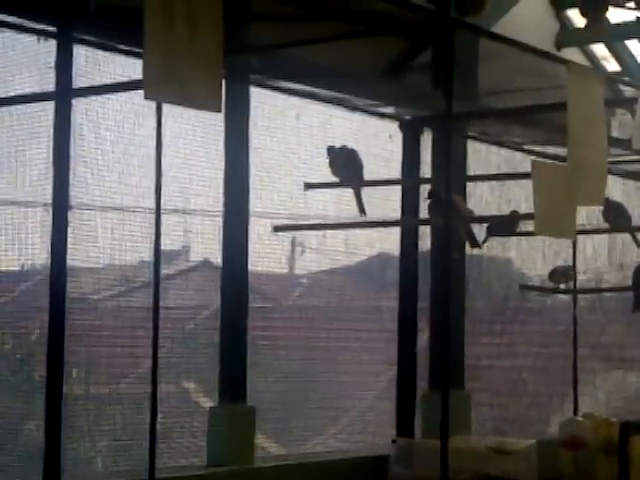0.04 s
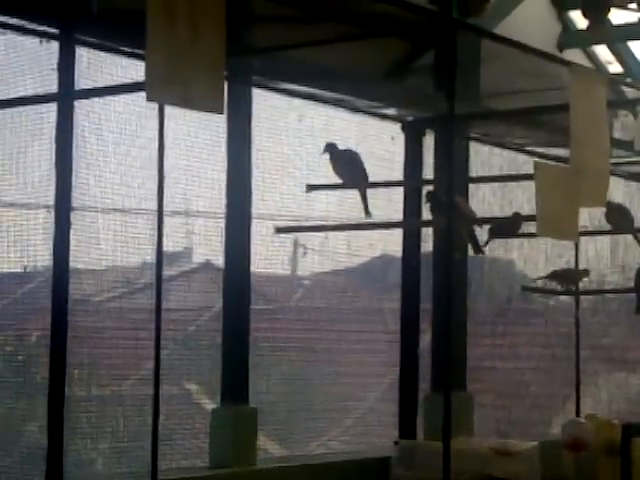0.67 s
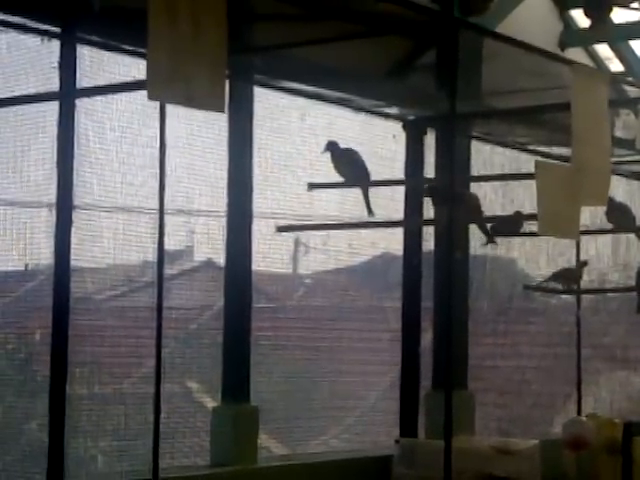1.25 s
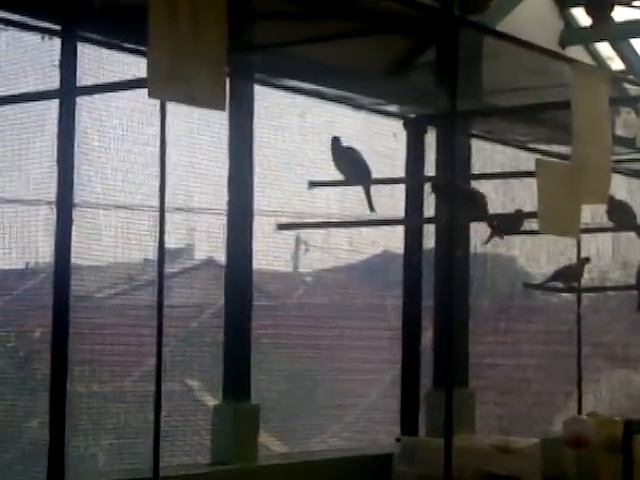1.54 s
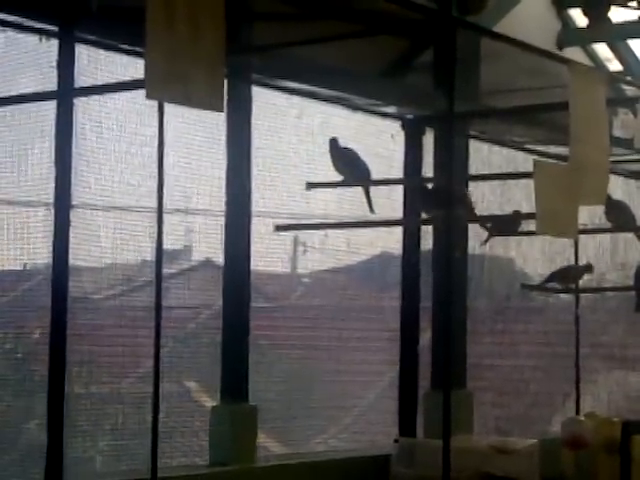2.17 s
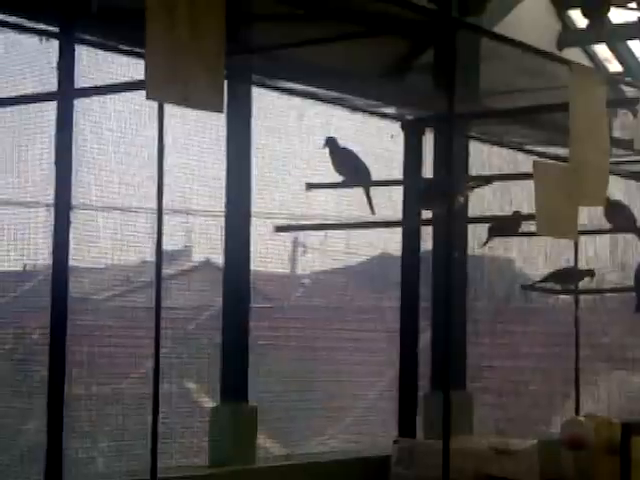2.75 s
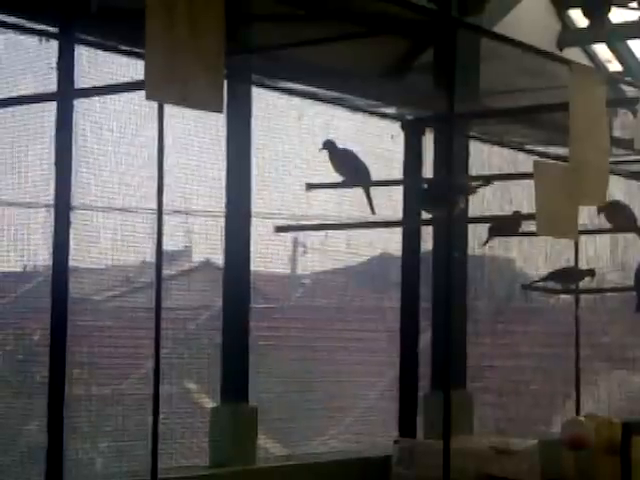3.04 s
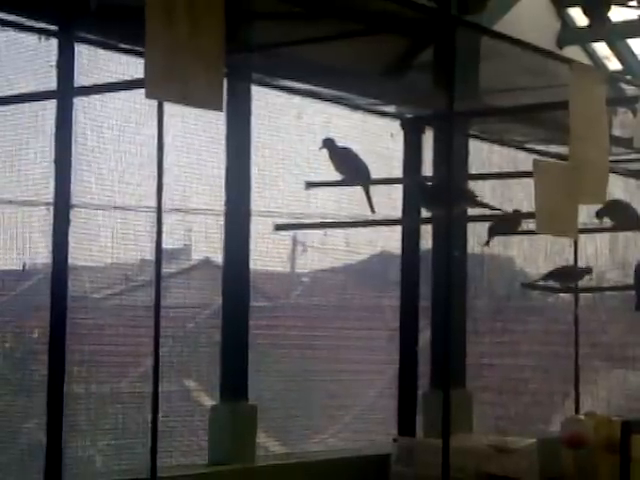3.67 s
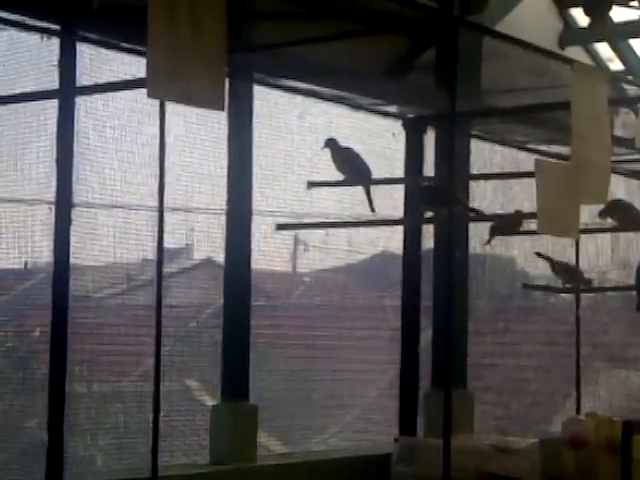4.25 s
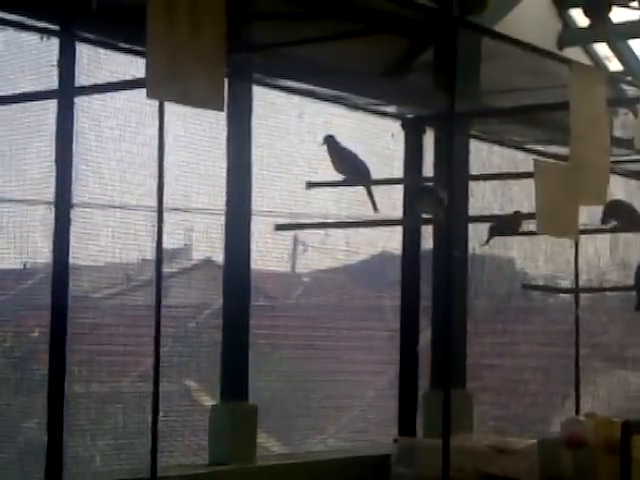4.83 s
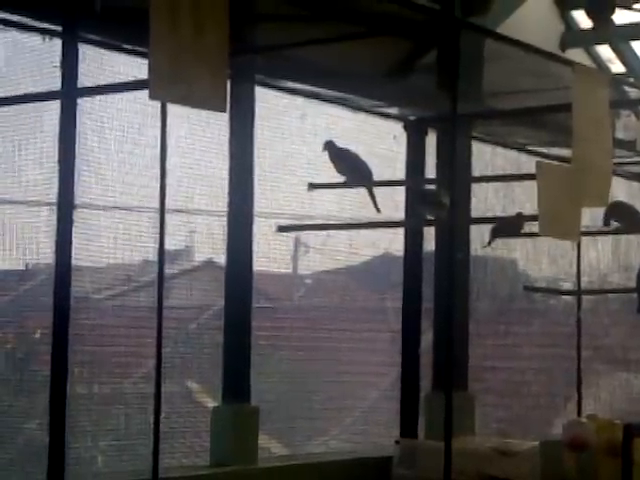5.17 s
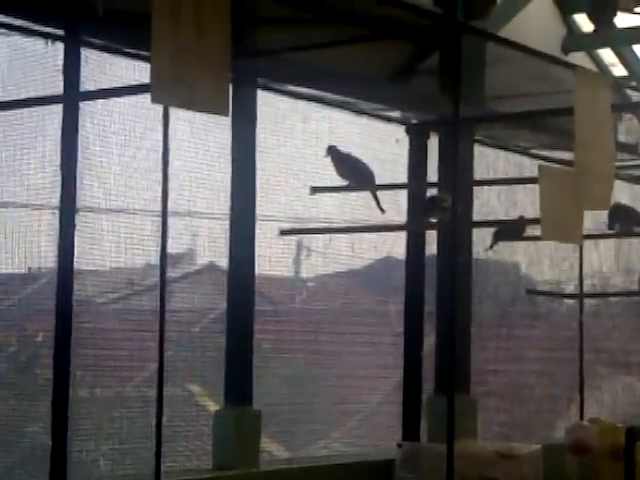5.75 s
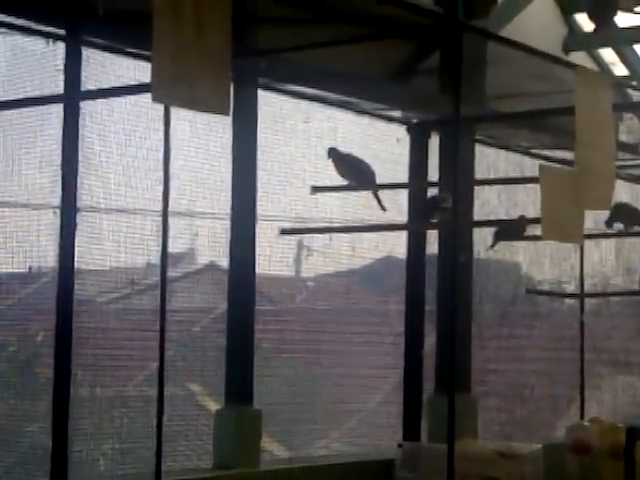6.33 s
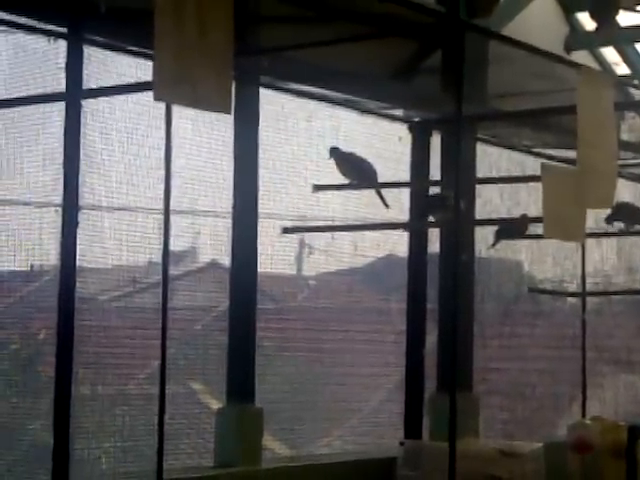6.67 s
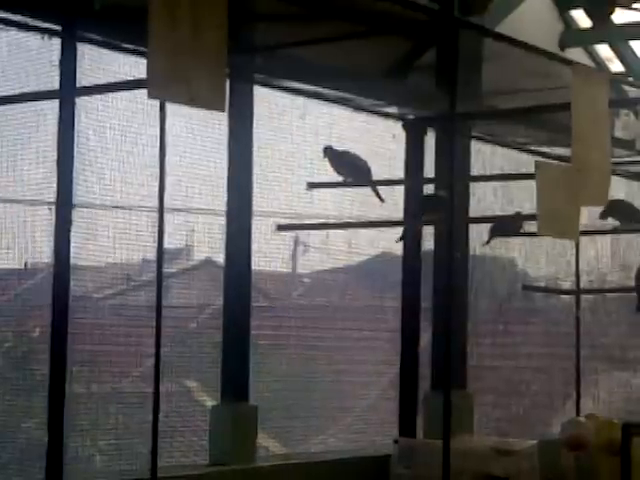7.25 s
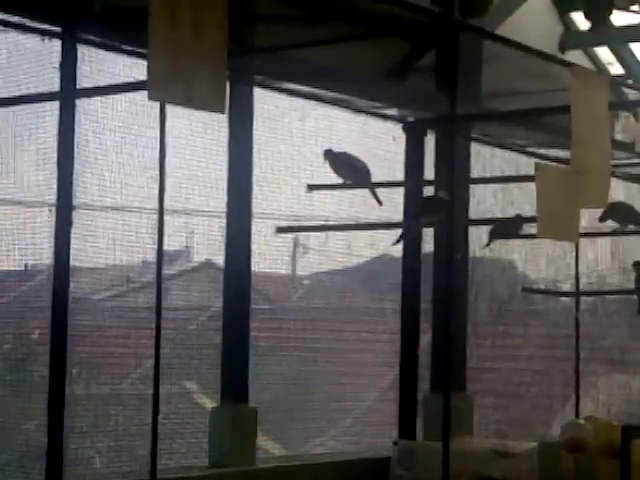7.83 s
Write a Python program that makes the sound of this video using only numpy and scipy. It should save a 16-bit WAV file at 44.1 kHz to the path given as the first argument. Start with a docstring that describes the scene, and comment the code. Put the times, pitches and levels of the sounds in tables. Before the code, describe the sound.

A husky run of dove coos, then a clearer run from a second dove, over soft outdoor air and shuffling feathers.

```python
"""Zebra doves in a roofed aviary

Close to the microphone two doves take turns: a husky run of slowing coos, then a clearer run of upward
scoops, each coo a nearly pure tone from the syrinx. Other doves answer from afar, birds shuffle and
flick their wings on the perches, and small birds chirp. Roof and walls add a short tail.
Outdoor air and a faint electronic whine from the camera lie under everything."""
import sys
import numpy as np
from scipy import signal
from scipy.fft import rfft, irfft, next_fast_len
from scipy.io import wavfile
from scipy.ndimage import uniform_filter1d, map_coordinates

SR = 44100
rng = np.random.default_rng(int(sys.argv[2]) if len(sys.argv) > 2 else 0)


def to_wav(sig):
    """Store sig (one row per channel, or 1-D mono) as 16-bit WAV at the path in sys.argv[1].

    Samples outside -1..1 are clipped; the rate is SR.
    """
    pcm = np.clip(np.atleast_2d(sig), -1, 1) * 32767
    pcm = np.round(pcm).astype(np.int16)
    wavfile.write(sys.argv[1], SR, pcm.T)  # frames by channels


N = 352844

# coos of the husky dove:
# (time [s], rise [s], hold [s], level [dB], top pitch [Hz], second harmonic [dB], third harmonic [dB])
HUSKY_COOS = [(.95, 0.072, 0.063, -35, 872, -51, -65.5), (1.31, 0.048, 0.0046, -37, 855, -53.5, -61),
              (1.51, 0.077, 0.0065, -34.5, 862, -50.5, -58), (1.735, 0.064, 0.011, -34.5, 869.7, -53, -55),
              (1.935, 0.082, 0.029, -34, 861, -55, -57.5), (2.175, 0.1, 0.13, -34, 860, -60.5, -68.5),
              (2.53, 0.0617, 0.17, -36.5, 856, -60.5, -69), (2.89, 0.073, 0.235, -36, 848.7, -59.5, -71),
              (3.445, 0.1, 0.218, -36, 837, -57, -58.5)]
# bands of noise: small birds above 2 kHz, and one swell of the distant dove chorus near 1 kHz
# (time [s], length [s], level [dB], centre [Hz], width [octaves])
NOISE_BANDS = [(.365, 0.23, -53, 2600, 0.61), (.38, 0.14, -56.5, 3800, 0.051),
               (1.511, 0.11, -60.5, 3150, 0.46), (4.419, 0.49, -56.5, 1074, 0.23),
               (5.449, 0.12, -62, 3430, 0.054), (6.536, 0.13, -58.5, 4560, 0.076),
               (6.533, 0.11, -57.5, 2760, 0.26)]


def husky_dove():
    """The first bird near the microphone: its syrinx rasps hard before each note settles."""
    # level contour shared by its coos: the settings of coo_level
    shape = dict(onset_db=-21.5, scoop_s=0.02, scoop_db=-9, ebb_db=-10, swell_s=0.013, ease_db_per_s=19, droop_db=1, release_s=0.019, release_db=8.5, ring_db_per_s=97.5, linger_s=0.15)
    return dove(HUSKY_COOS, shape, ring_s=0.13, scoop=0.1405, climb=0.872, bend=1.913, sag=0.2396,
                fall=0.007, rasp=0.85, rasp_s=0.062, rough=0.053, flutter_db=6.5,
                follow=0.66, fade_db_per_s=38.5, overtone_rough=0.33,
                wet_db=-15, scoop_wet_db=-11, overtone_wet_db=-2)


def clear_dove():
    """The second near bird: a steadier syrinx and a deeper scoop up to each note."""
    # (time [s], rise [s], hold [s], level [dB], top pitch [Hz], second harmonic [dB], third [dB])
    coos = [(5.07, 0.12, 0.11, -35.5, 888, -49.5, -55.5), (5.57, 0.041, 0.02, -38.5, 836, -56.5, -57.5),
            (5.78, 0.038, 0.013, -38, 842.5, -56, -56.5), (5.975, 0.064, 0.015, -36, 859, -51, -64),
            (6.2, 0.074, 0.0087, -33, 870.4, -50.5, -60), (6.42, 0.061, 0.017, -33.5, 872, -49, -60),
            (6.65, .062, 0.011, -31.5, 879, -47, -66), (6.885, 0.0727, 0.018, -31.5, 882, -47.5, -63),
            (7.145, 0.077, 0.026, -32, 878.4, -46.5, -63), (7.415, .084, 0.047, -33.5, 875, -48.5, -71),
            (7.72, 0.1, 0.32, -36, 867, -49.5, -65)]
    # level contour shared by its coos: the settings of coo_level
    shape = dict(onset_db=-19, scoop_s=0.031, scoop_db=-3.5, ebb_db=-9.5, swell_s=0.011, ease_db_per_s=55.5, droop_db=1.5, release_s=0.0093, release_db=8, ring_db_per_s=118.5, linger_s=.6)
    return dove(coos, shape, ring_s=0.17, scoop=0.21, climb=1.55, bend=2.9, sag=0.041,
                fall=0.013, rasp=0.33, rasp_s=0.057, rough=0.026, flutter_db=5,
                follow=0.44, fade_db_per_s=25, overtone_rough=0.3,
                wet_db=-12, scoop_wet_db=-3.5, overtone_wet_db=-5.5)


def dove(coos, shape, ring_s, scoop, climb, bend, sag, fall, rasp, rasp_s, rough, flutter_db,
         follow, fade_db_per_s, overtone_rough, wet_db, scoop_wet_db, overtone_wet_db):
    """Each coo is a nearly pure tone that starts with a rasp and scoops up to its pitch."""
    # brief level dips in the held coos: (time [s], half width [s], depth [dB])
    dips = [(1.052, 0.0065, 20), (2.72, 0.013, 26), (2.804, 0.017, 15), (3.03, 0.033, 14.5),
            (3.75, 0.012, 25), (5.255, 0.008, 12.5), (7.921, 0.039, 6.5)]
    attack_s, fade_out_s, pitch_fall_s, tremble = 0.011, 0.05, 0.032, 0.35
    out = np.zeros(N)
    for s, rise, hold, db, top_hz, second_db, third_db in coos:
        t = clock(rise + hold + ring_s)
        gate = np.sqrt(2) * np.clip(np.minimum(t / attack_s, (t[-1] - t) / fade_out_s), 0, 1)
        # the pitch climbs as pressure builds, sags as a long note runs out and falls a little on release
        climbing = np.clip(1 - t / (climb * rise), 0, 1)
        released = np.clip((t - rise - hold) / pitch_fall_s, 0, 1)
        pitch_hz = top_hz * (1 - scoop * climbing ** bend - sag * t ** 2 - fall * released)
        phase = 2 * np.pi * np.cumsum(pitch_hz) / SR
        # the syrinx trembles until it locks on to the note
        unrest = rough + rasp * np.exp(-(t / rasp_s) ** 2)
        tone = gate * np.sin(phase + unrest * wobble(t, 220))
        tone *= 1 + tremble * unrest * wobble(t, 160)
        # the top of the swell is round and smooth, while its flanks flutter
        level_db = uniform_filter1d(coo_level(t, rise, hold, **shape), size=SR // 70)
        flank = np.clip(-level_db / 10, 0, 1)
        dips_db = sum(depth * np.exp(-((s + t - at) / width) ** 2) for at, width, depth in dips)
        tone *= amp(db + level_db - dips_db + flutter_db * flank * (0.95 - np.abs(wobble(t, 50))))
        # the low scoop hangs in the aviary and beats against the held pitch
        early = np.sin(np.pi / 2 * np.clip(1 - t / rise, 0, 1))
        add(out, s, aviary(tone * early, scoop_wet_db) + aviary(tone * (1 - early), wet_db))
        # overtones follow a share of the swell; the higher they are, the sooner they fade
        overtones = np.zeros(len(t))
        for k, harmonic_db in [(2, second_db), (3, third_db)]:
            gain = amp(harmonic_db + follow * level_db - fade_db_per_s * (k - 1) * t)
            overtones += gain * np.sin(k * (phase + overtone_rough * wobble(t, 130)))
        add(out, s, aviary(gate * overtones, overtone_wet_db))
    return out


def coo_level(t, rise, hold, onset_db, scoop_s, scoop_db, ebb_db, swell_s, ease_db_per_s, droop_db,
              release_s, release_db, ring_db_per_s, linger_s):
    """Level of a coo in dB from its top: a soft scoop, a swell, a hold, then a quick drop and a fade."""
    ebb = max(rise - swell_s, scoop_s)
    push = np.interp(t, [0, scoop_s, ebb, max(rise, ebb + 0.004)], [onset_db, scoop_db, ebb_db, 0])
    easing = ease_db_per_s * np.maximum(rise - t, 0)  # a slow rise starts softer
    tiring = droop_db * np.clip((t - rise) / hold, 0, 1) ** 4
    after = np.maximum(t - rise - hold, 0)
    fading = ring_db_per_s * after / (1 + hold / linger_s)  # a long hold fades more slowly
    return push - easing - tiring - release_db * np.minimum(after / release_s, 1) - fading


def croaks(level_db, length_s):
    """The husky dove opens every coo with a short catch: noise through the resonances of its throat."""
    # throat resonances: (centre [Hz], width [Hz], level [dB])
    resonances = [(660, 52, -12.5), (753, 15, 6), (1090, 230, -11.5), (1272, 49, -3), (1480, 240, -16),
                  (2510, 100, -19)]

    def throat_db(hz):
        power = sum(amp(db) ** 2 / (1 + ((hz - centre) / width) ** 2) ** 2
                    for centre, width, db in resonances)
        return 10 * np.log10(power)

    out, t = np.zeros(N), clock(length_s)
    for s, *_ in HUSKY_COOS:
        add(out, s, aviary(amp(level_db) * swell(t, 0.7) * noise(t, throat_db), wet_db=-3.5))
    return out


def far_doves():
    """Far from the microphone: single soft coos, and a chorus that distance blurs into a narrow wash."""
    # swells of the chorus: (time [s], length [s], level [dB])
    chorus = [(-.06, .22, -60.5), (.45, 1, -54.5), (1.15, 0.89, -48), (2.35, 0.47, -53), (2.75, 1, -54.5),
              (4.95, .5, -59)]
    # spectrum of the chorus: (frequency [Hz], relative level [dB])
    colour = [(600, -49.5), (820, 1.5), (960, 3.5), (1060, 3), (1180, -7), (1350, -11), (1800, -41)]
    # single coos: (time [s], length [s], pitch [Hz], level [dB])
    coos = [(0, 0.063, 890, -49.5), (.17, 0.14, 874, -52.5), (.36, 0.088, 872, -51.5),
            (.54, 0.051, 845, -50), (5.614, 0.18, 932, -52)]
    out = np.zeros(N)
    for s, length, db in chorus:
        t = clock(length)
        add(out, s, amp(db) * swell(t, 0.58) * noise(t, lambda hz: along(colour, hz)))
    for s, length, hz, db in coos:
        t = clock(length)
        coo = amp(db) * swell(t, 0.62) * np.sin(2 * np.pi * hz * t + 1.1 * wobble(t, 64))
        add(out, s, aviary(coo, wet_db=-7))
    soft_wash = band_swells(band for band in NOISE_BANDS if band[3] < 2000)
    return out + soft_wash


def wings():
    """On the perches, feathers brush each other in short, uneven puffs."""
    # wing flicks and shuffles: (time [s], length [s], level [dB], tilt [dB per octave])
    rustles = [(0.135, 0.077, -65, 2), (0.744, .1, -54, -2.5), (1.12, 0.14, -48, -0.5),
               (2.221, 0.21, -49, -0.5), (2.55, 0.75, -61, 3.5), (3.607, 0.1, -52.5, -1),
               (4.003, 0.12, -50.5, -1.5), (4.766, 0.096, -54, -1), (4.885, 0.11, -47, -1),
               (5.292, 0.21, -54, -1), (5.464, 0.085, -51.5, 2), (5.858, 0.14, -53, -1.5),
               (6.428, 0.27, -55, 1.5), (7.011, .11, -50.5, -1), (7.861, 0.044, -51.5, -2)]
    # spectrum of brushing feathers: (frequency [Hz], relative level [dB])
    feathers = [(100, -19.5), (300, 2.5), (900, 2.5), (2000, 1), (3200, -6), (4500, -9.5), (7000, -27)]
    flutter_db = 1.7
    out = np.zeros(N)
    for s, length, db, tilt_db in rustles:
        t = clock(length)
        puff = noise(t, lambda hz: along(feathers, hz) + tilt_db * np.log2(hz / 1500 + 0.01))
        envelope = amp(db + flutter_db * wobble(t, 110)) * swell(t, 0.51)
        add(out, s, aviary(envelope * puff, wet_db=-6))
    return out


def small_birds():
    """High, harsh chirps: a rasp in one throat resonance, wide or narrow."""
    return band_swells(band for band in NOISE_BANDS if band[3] >= 2000)


def outdoor_air():
    """The open air around the aviary: a broad hush whose level drifts slightly."""
    # spectrum of the air: (frequency [Hz], relative level [dB])
    colour = [(15, -41.5), (25, -20.5), (60, -14), (100, -10.5), (170, -1.5), (330, -1), (600, -2.5),
              (900, -4), (1300, -6.5), (2100, -6.5), (3400, -13.5), (5500, -15), (7300, -18), (8700, -32.5)]
    t = np.arange(N) / SR
    return amp(-57.5 + 0.47 * wobble(t, 1)) * noise(t, lambda hz: along(colour, hz))


def camera_whine(fundamental_hz):
    """The electronics behind the microphone whine thinly on high harmonics of one steady pitch."""
    # partials of the whine: (harmonic [number], level [dB])
    partials = [(15, -84.5), (16, -80.5), (17, -83.5), (18, -81), (19, -82.5), (20, -84), (21, -83),
                (22, -81.5), (23, -86)]
    t = np.arange(N) / SR
    return np.sqrt(2) * sum(amp(db) * np.sin(2 * np.pi * (k * fundamental_hz * t + rng.random()))
                            for k, db in partials)


def aviary(x, wet_db):
    """A sound reaches the microphone directly and as a tail off roof and walls, its energy unchanged."""
    # decay of the tail: (frequency [Hz], time to fall 60 dB [s])
    decay_times = [(200, 0.89), (900, 0.6), (3000, 0.34), (8000, 0.11)]
    hz, t, spectra = signal.stft(rng.standard_normal(SR // 2), SR, nperseg=256)
    decay = amp(-60 * t / along(decay_times, hz)[:, None])
    tail = signal.istft(spectra * decay, SR, nperseg=256)[1]
    response = amp(wet_db) * tail / np.linalg.norm(tail)
    response[0] += 1  # the direct path
    heard = signal.fftconvolve(x, response)
    return heard * np.linalg.norm(x) / np.linalg.norm(heard)


def band_swells(bands):
    """Bands of noise that swell and flutter in the aviary."""
    out = np.zeros(N)
    for s, length, db, centre_hz, width in bands:
        t = clock(length)
        band = noise(t, lambda hz: -4.3 * (np.log2((hz + 1) / centre_hz) / width) ** 2)
        envelope = amp(db + 2.9 * wobble(t, 150)) * swell(t, 0.32)
        add(out, s, aviary(envelope * band, wet_db=-3.5))
    return out


def amp(db):
    """Decibels to gain."""
    return 10 ** (np.asarray(db) / 20)


def along(points, hz):
    """Read (frequency [Hz], value) points on a log axis."""
    frequencies, values = np.transpose(points)
    return np.interp(np.log(hz + 1), np.log(frequencies + 1), values)


def clock(length):
    """Sample times from zero to length seconds."""
    return np.arange(int(length * SR)) / SR


def wobble(t, rate):
    """A smooth random curve with rate knots a second."""
    return map_coordinates(rng.standard_normal(int(t[-1] * rate) + 4), [t * rate], mode="nearest")


def filtered(x, gain):
    """x through a gain that is a function of frequency."""
    size = next_fast_len(len(x) + 8192)
    return irfft(rfft(x, size) * gain(np.fft.rfftfreq(size, 1 / SR)), size)[:len(x)]


def noise(t, colour):
    """Noise of rms 1 whose spectrum in dB has the shape colour(Hz)."""
    x = filtered(rng.standard_normal(len(t)), lambda hz: amp(colour(hz)))
    return x / np.sqrt(np.mean(x ** 2) + 1e-20)


def swell(t, skew):
    """One smooth hump over t; a skew under 1 brings its top forward."""
    return np.abs(np.sin(np.pi * (t / t[-1]) ** skew))


def add(track, s, sound):
    """Mix a sound into the track at s seconds."""
    start = max(round(s * SR), 0)
    part = track[start:start + len(sound)]
    part += sound[:len(part)]


def scene():
    """One microphone in the aviary: two doves close by, the other birds and the air behind them."""
    near_doves = husky_dove() + clear_dove() + croaks(level_db=-48.5, length_s=0.045)
    other_birds = far_doves() + wings() + small_birds()
    background = outdoor_air() + camera_whine(fundamental_hz=275.35)
    return (near_doves + other_birds + background)[None]


def record(dry):
    """The camera cuts off steeply above its band limit."""
    top_hz = 8300
    return filtered(dry[0], lambda hz: 1 / np.sqrt(1 + (hz / top_hz) ** 80))[None]


dry = scene()
out = record(dry)
to_wav(out)
```